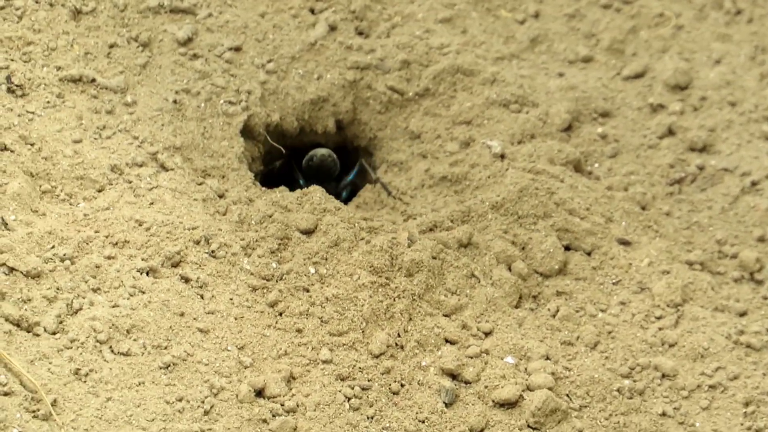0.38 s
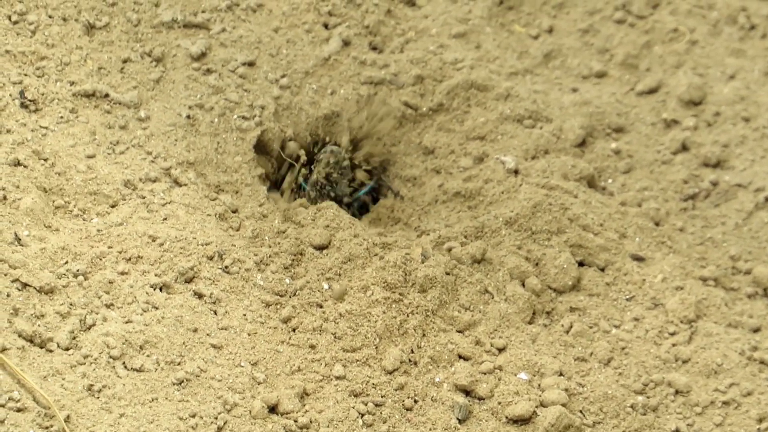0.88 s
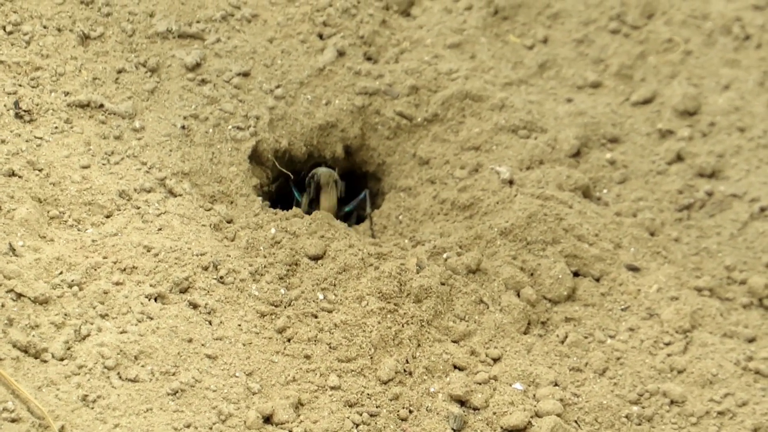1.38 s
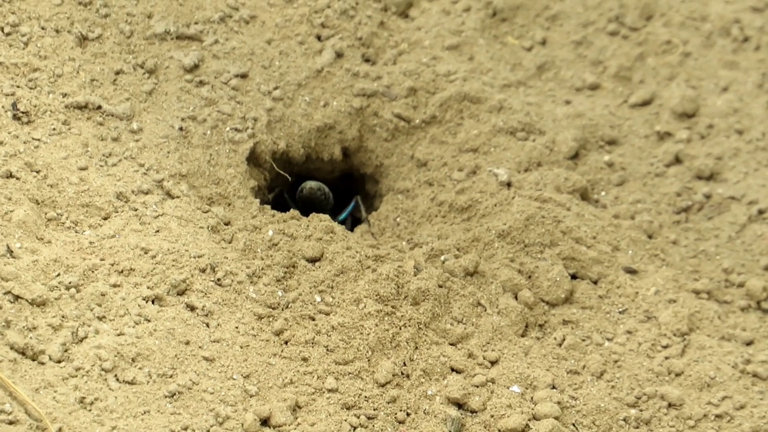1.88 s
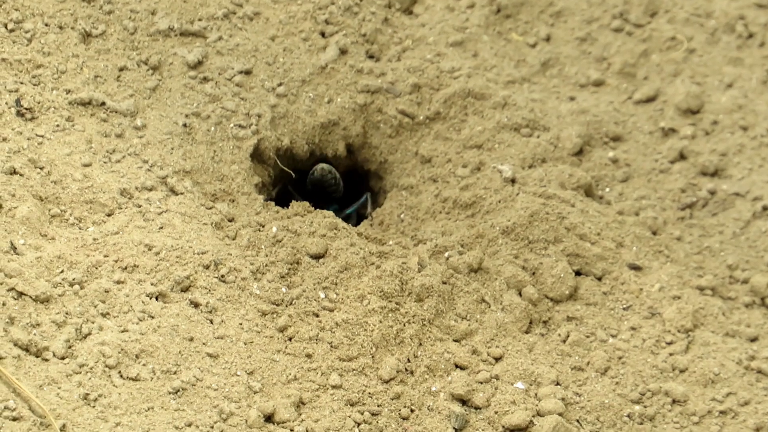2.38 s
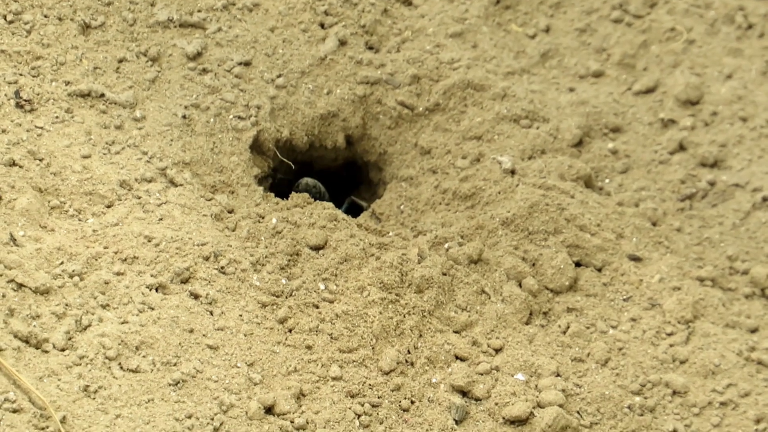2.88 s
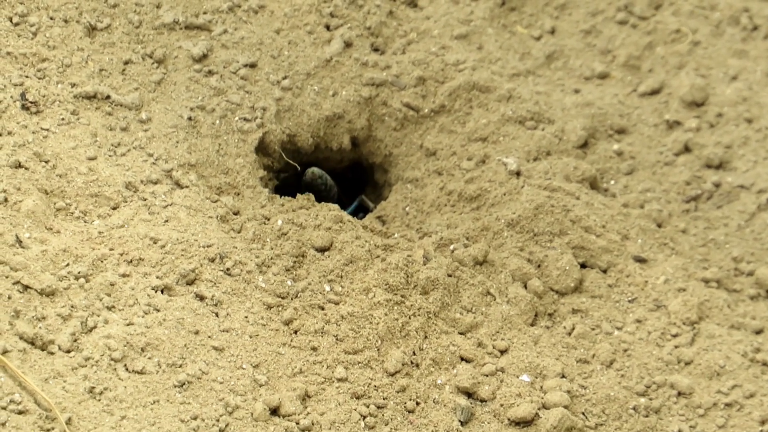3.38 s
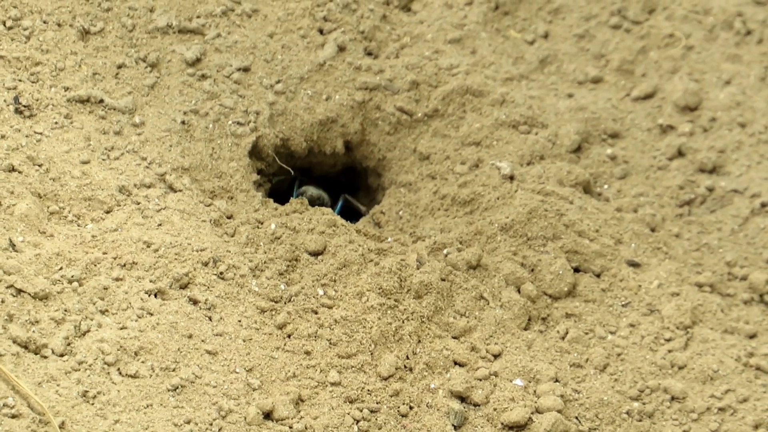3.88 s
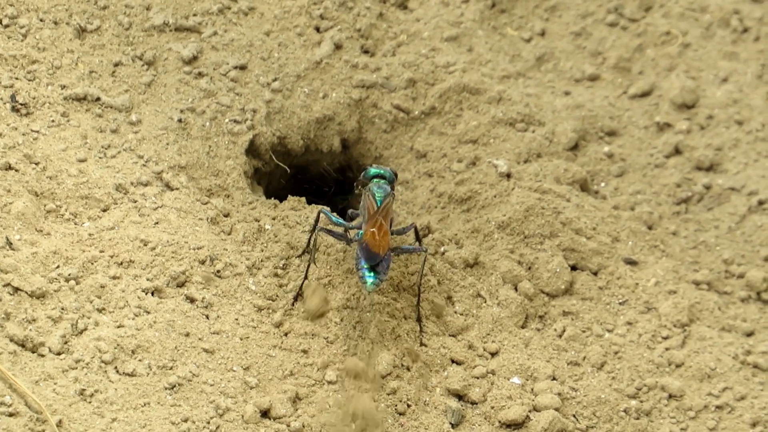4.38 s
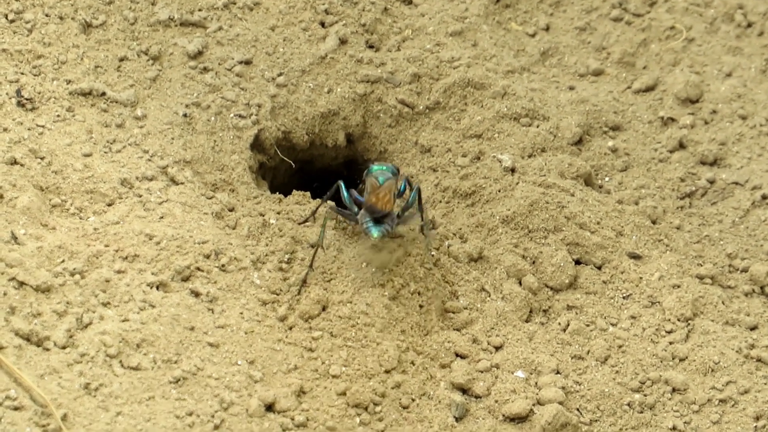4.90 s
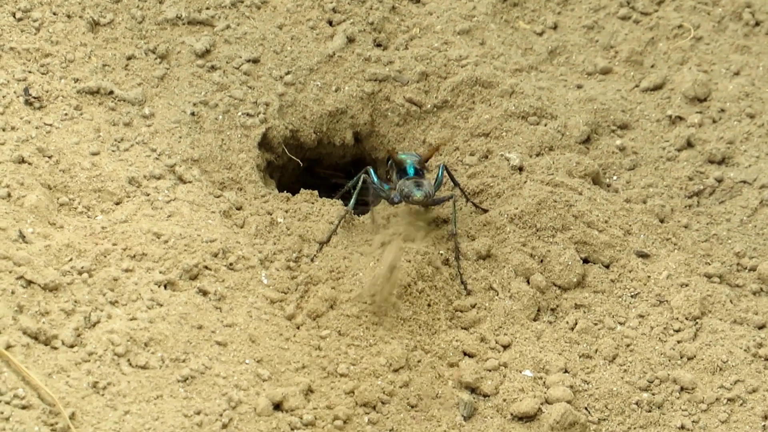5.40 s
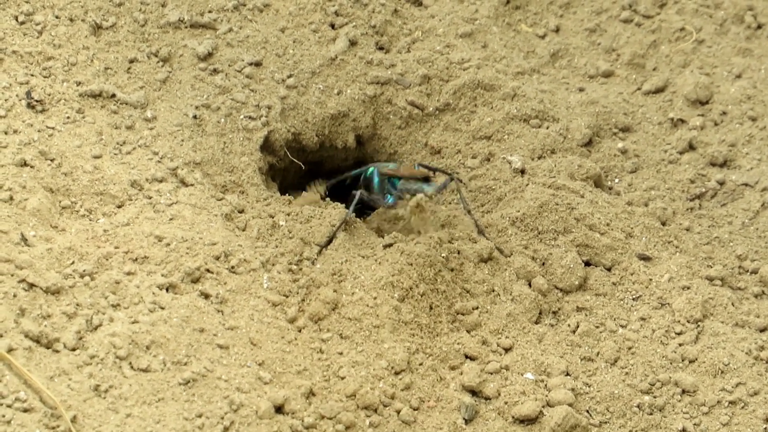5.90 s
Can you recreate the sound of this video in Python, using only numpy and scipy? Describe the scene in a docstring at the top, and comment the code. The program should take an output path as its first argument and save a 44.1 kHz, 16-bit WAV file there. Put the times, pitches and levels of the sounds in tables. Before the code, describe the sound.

Open-air birdsong in stereo. A clear, almost pure whistle dips, rises and drops away four times, growing fainter. Between whistles a nearby small bird spits rapid falling chatter, and a crow gives two long, grating caws, around two and three and a half seconds. Far squawks, high trills and tiny dry rustles fill the gaps, while wind bumps each of two spaced microphones separately.

```python
"""Birds in the open, two spaced microphones

Gusts thump each microphone on its own as shaped noise, over still air and a diffuse wash of noise.
Far birds squawk (resonant noise) and trill (5 kHz pips), dry rustles hiss, something croaks low.
A chattering bird near by throws quick glides; a crow caws twice, throat pulses through resonances.
The main voice repeats a clear rising-and-falling whistle, an almost pure tone with pitch-bent partials."""
import sys
import numpy as np
from scipy import signal
from scipy.fft import rfft, irfft, next_fast_len
from scipy.io import wavfile
from scipy.ndimage import uniform_filter1d, map_coordinates

SR = 44100
rng = np.random.default_rng(int(sys.argv[2]) if len(sys.argv) > 2 else 0)


def convert_level_to_amplitude(level_db):
    """Map a level in decibels to its linear amplitude factor."""
    exponent = np.asarray(level_db, float) / 20
    return 10 ** exponent


def store_wav(level_fs):
    """Save 16-bit WAV to argv[1]."""
    pcm = np.round(np.clip(np.atleast_2d(level_fs), -1, 1) * 32767)
    wavfile.write(sys.argv[1], SR, pcm.T.astype(np.int16))


N = 265570  # samples

# Still air, spectrum: (frequency [Hz], relative level [dB])
AIR_SPECTRUM = [(24, -23), (40, -4.5), (473, 0), (905, -4.5), (1960, 4.5), (3940, -13.5), (6830, -13),
                (8340, -42), (9690, -18.5), (13100, -15), (15600, -59)]
AIR_DB = -59
# Diffuse wash of mid and high noise, swelling around the loud calls: (time [s], level [dB])
WASH = [(0.0, -58.5), (0.45, -71), (1.25, -52), (1.5, -66), (1.7, -52), (2.15, -47), (2.9, -54),
        (3.25, -61), (3.8, -39), (4.2, -50), (4.66, -68.5), (5.6, -55), (5.75, -47.5), (6.02, -51)]
# Gusts: (time [s], half width [s], relative peak level [dB], left-right [dB])
GUSTS = [(.13, .05, -49.5, -35), (.55, 0.073, -51, 33), (.77, 0.07, -50, 44), (.89, 0.031, -46, 42),
         (0.969, 0.036, -38, 33), (1.088, 0.05, -40, 34), (1.34, 0.19, -57.5, -6), (1.612, 0.1, -33.5, 45),
         (1.712, 0.032, -32, 45), (1.859, .15, -43, -1), (2.042, 0.11, -40.5, 38), (2.199, 0.08, -38, 21),
         (2.46, 0.054, -48.5, -30), (2.6, 0.12, -40.5, -19), (2.97, 0.059, -48, 40), (3.14, .06, -52, 28),
         (3.36, 0.18, -57.5, 27), (4.19, 0.088, -65, -10), (4.7, 0.13, -55.5, -40), (5.068, 0.06, -34, -40),
         (5.2, 0.13, -43.5, -45), (5.44, 0.27, -44, -35), (5.769, 0.081, -28.5, -47),
         (5.971, 0.075, -43, -47)]
# Low buffeting at the capsules, spectrum: (frequency [Hz], relative level [dB])
BUFFET_SPECTRUM = [(15, -75), (25, -2), (75, 4.5), (160, 1), (221, -10.5), (414, -83), (500, -27),
                   (650, -82), (1100, -120)]
# Drop at one half width from a gust's peak; floor between gusts, on the scale of the gust levels
GUST_EDGE_DB, LULL_DB = 16.5, -83.5
# Brief dry rustles: (time [s], relative peak level [dB])
RUSTLES = [(0.4975, -48), (0.6434, -57), (0.8265, -46.5), (1.028, -42.5), (4.621, -42), (4.8294, -47.5)]
# Hoarse far calls: (time [s], length [s], resonance [Hz], width [Hz], level [dB])
SQUAWKS = [(0, 0.08, 1060, 504, -52.5), (0.195, 0.065, 3000, 1670, -48.5), (0.461, 0.11, 4760, 1400, -56),
           (0.534, .11, 2640, 1280, -49.5), (0.665, 0.071, 3000, 500, -49), (1.065, 0.051, 2270, 900, -57),
           (1.242, 0.09, 2250, 1554, -55.5), (1.7, 0.048, 3200, 2460, -39), (2.583, .17, 3080, 980, -44),
           (3.698, 0.24, 3394, 1610, -40), (4.415, 0.1, 3530, 1500, -55.5), (4.563, 0.15, 4800, 3040, -59),
           (4.642, 0.065, 2930, 2100, -52), (5.273, 0.12, 5570, 1090, -54.5),
           (5.297, 0.16, 3450, 1470, -57), (5.536, .14, 2770, 1375, -46.5),
           (5.539, 0.086, 5900, 900, -55.5), (5.688, 0.24, 6440, 1000, -63),
           (5.749, 0.15, 2900, 500, -51.5), (5.855, .15, 2630, 1800, -49.5)]
# High far trills: (time [s], length [s], pulse rate at start [1/s], at end [1/s], peak level [dB])
TRILLS = [(0.248, 0.21, 68, 26, -46.5), (0.813, 0.22, 51, 40.8, -44), (2.783, 0.03, 33, 44, -33),
          (3.128, 0.26, 55, 56, -52), (4.308, 0.183, 66, 34.4, -46), (4.933, 0.26, 70, 45, -47.5),
          (5.482, 0.2, 74, 39, -43.5)]
# Low throbbing croak: (time [s], length [s], from [Hz], to [Hz], relative level [dB])
CROAKS = [(3.374, 0.067, 347, 387, -45), (3.444, 0.0376, 417, 508, -45.5)]
# The near bird's falling phrase:
# (time after phrase start [s], length [s], from [Hz], to [Hz], relative level [dB])
PHRASE_GLIDES = [(-.012, 0.0093, 3283, 4550, -35.5), (0, 0.0118, 5690, 3470, -33),
                 (.009, 0.0215, 4074, 2943, -36), (0.028, 0.0267, 2870, 2734, -39),
                 (0.06, .018, 2433, 1480, -35.5), (0.081, 0.024, 1618, 1523, -42.5),
                 (0.174, 0.025, 1894, 1674, -47.5), (.162, 0.0144, 4210, 3500, -45.5),
                 (.176, .016, 3750, 3650, -35), (.178, 0.0443, 5500, 5355, -50),
                 (.203, 0.0079, 4840, 3590, -32), (0.21, .014, 3500, 2006, -42)]
# Where the phrase is sung: (time [s], level offset [dB])
PHRASE_STARTS = [(1.55, 1.5), (3.299, 0.5)]
# Other glides of the chattering birds: (time [s], length [s], from [Hz], to [Hz], relative level [dB])
LOOSE_GLIDES = [(0.185, 0.0134, 2670, 5060, -52), (0.197, 0.0215, 3960, 4060, -49),
                (0.315, .008, 2300, 1600, -57), (0.49, 0.067, 5670, 5670, -62),
                (0.187, 0.05, 2200, 2066, -56), (0.413, .057, 3880, 4850, -59),
                (0.643, 0.0246, 2066, 2430, -48.5), (0.676, 0.027, 3142, 3050, -53.5),
                (1.015, 0.017, 2110, 2350, -50), (1.065, 0.013, 2620, 2810, -42.5),
                (1.082, 0.0129, 2350, 1820, -41), (1.299, 0.033, 2730, 2770, -51.5),
                (1.409, 0.0195, 1170, 1720, -55), (1.422, 0.035, 1820, 2080, -56.5),
                (1.486, 0.026, 1733, 2430, -49), (1.499, 0.036, 4290, 5080, -44.5),
                (1.521, 0.03, 5110, 5210, -41.5), (1.7, 0.018, 1920, 1355, -51),
                (1.712, .012, 3160, 2940, -45), (3.511, 0.0091, 4500, 4260, -43),
                (1.57, 0.011, 4080, 3800, -41), (1.736, 0.012, 3750, 3350, -32),
                (1.65, .014, 1490, 1390, -44), (1.904, 0.0374, 1740, 1510, -50),
                (1.938, .029, 2065, 1248, -51), (1.936, 0.027, 3935, 3250, -35.5),
                (1.961, 0.0176, 3936, 2296, -38.5), (1.973, 0.033, 3420, 3330, -32.5),
                (1.984, 0.0112, 3320, 2100, -49), (1.987, 0.018, 4680, 3950, -42),
                (2.004, 0.0092, 3360, 4760, -26.5), (2.008, .016, 4690, 1397, -34),
                (2.034, .012, 2950, 2690, -27), (2.041, 0.02, 2760, 1700, -40),
                (2.072, 0.062, 3510, 3590, -38), (2.079, 0.009, 5160, 4930, -39),
                (2.846, 0.017, 3600, 3610, -42.5), (2.867, 0.0088, 3680, 3200, -36),
                (2.872, 0.031, 2155, 1414, -48), (2.883, 0.013, 4100, 3630, -46),
                (2.907, 0.0192, 1924, 1280, -51), (2.92, 0.0196, 3430, 4480, -44),
                (2.924, 0.0148, 1500, 2330, -41.5), (2.939, 0.033, 2960, 3176, -35.5),
                (2.943, .033, 6100, 6060, -51.5), (2.963, 0.0079, 5270, 3580, -42.5),
                (2.971, 0.0195, 3200, 2440, -37), (2.983, 0.0536, 2478, 2484, -34),
                (3.216, 0.087, 3250, 3170, -58.5), (3.222, 0.053, 3640, 4320, -52),
                (3.226, 0.0585, 1803, 2356, -53.5), (3.23, 0.05, 1526, 1610, -61),
                (3.453, 0.026, 1608, 1227, -54), (4.434, 0.017, 2730, 3000, -54),
                (4.44, 0.0416, 2072, 1773, -57), (4.46, .008, 3650, 2400, -60),
                (4.474, .008, 4000, 2500, -60), (4.68, .02, 2290, 2250, -63),
                (0.542, 0.029, 3310, 2890, -57), (0.579, 0.029, 2760, 2670, -55),
                (4.492, 0.0098, 4110, 2700, -55), (4.615, 0.0263, 2780, 3100, -50.5),
                (4.648, 0.0084, 2260, 4000, -58), (4.673, 0.01, 4180, 2300, -48),
                (4.814, 0.0467, 3710, 3856, -51.5), (4.87, 0.0124, 3700, 3030, -48.5),
                (4.886, 0.063, 2528, 2454, -59), (5.022, 0.057, 3820, 3955, -55.5),
                (5.083, 0.011, 3700, 3270, -50), (5.103, 0.037, 2640, 2430, -58),
                (5.188, 0.0106, 3610, 2920, -51.5), (5.236, .07, 4730, 5270, -62),
                (5.249, 0.029, 3610, 3910, -55.5)]
# Left-right: treble favours the left microphone, lower notes the right
SIDE_AT_3K_DB, SIDE_DB_PER_OCTAVE = 1.5, 6
# Caws: (time [s], length [s], level [dB], full effort until [s], fading after that [dB/s])
CAWS = [(2.058, .77, -28.5, 0.24, 12.5), (3.583, .745, -29.5, .21, 17)]
# Fixed resonances of the crow's body: (centre [Hz], width [Hz], relative level [dB])
BODY_RESONANCES = [(1150, 500, -32), (1680, 200, -7), (3300, 900, -24)]
# Treble resonances of the crow, set together by CROW_TREBLE_DB:
# (centre [Hz], width [Hz], relative level [dB])
TREBLE_RESONANCES = [(4320, 400, -39.5), (5900, 1660, 4), (9200, 1900, -8), (11260, 700, -6),
                     (13700, 1800, -20)]
CROW_TREBLE_DB = -30.5
BEAK_PER_PULSE = 24.78  # the beak resonance moves with effort: Hz per pulse per s
# Throat pulses per s at the opening and in full voice; s to get there
OPENING_RATE, FULL_RATE, RATE_RISE_S = 73, 82.4, .13
# From this age [s] the rate sags, in pulses per s each second
SAG_FROM_S, RATE_SAG = .2, 28
# Whistles: (time [s], crest time [s], crest pitch [Hz], crest level [dB], opening re crest [dB])
WHISTLES = [(0.795, 1.172, 1394, -28, -10), (2.161, 2.494, 1356, -29.5, -11),
            (3.65, 4.026, 1401, -33, -11.5), (5.42, 5.782, 1416, -36.5, -17)]
# Rise to the crest: (share of the way in time [0-1], height from dip to crest [share])
WHISTLE_RISE = [(0, -.4), (.06, .38), (.12, .3), (.25, .05), (.42, 0), (.58, .11), (0.749, .42),
                (0.901, .85), (0.999, 0.99)]
# Fall after the crest: (time after crest [s], pitch re crest [Hz], level re crest [dB])
WHISTLE_FALL = [(.03, -36.5, -5), (.085, -240, -8.5), (.13, -360, -8.5), (0.239, -610, -28.5)]
# Upper partials: (multiple of the pitch, relative level [dB], strongest at [Hz])
WHISTLE_PARTIALS = [(2, -38, 2700), (4, -23, 5600), (5, -26, 6300), (7, -33, 9700), (8, -25, 11000),
                    (10, -37, 13700)]
# Reflections shift the whistle's balance with pitch: (pitch [Hz], left-right [dB])
WHISTLE_BALANCE = [(850, 2), (1000, -3.5), (1130, -7.5), (1200, -7), (1290, -2), (1400, 1)]
# Dip pitch before a crest of 1390 Hz; Hz lower for each Hz of a higher crest
DIP_HZ, DIP_DEEPENS = 1144.5, .6
# Echoes from the trees: (frequency [Hz], decay time to -60 dB [s])
TREE_DECAY = [(800, 0.29), (3000, 0.34), (8000, 0.095)]


def unit(x):
    """Scaled to rms 1."""
    return x / np.sqrt(np.mean(x ** 2) + 1e-20)


def along(points, hz):
    """Reads (Hz, value) points on a log frequency axis."""
    f, v = np.transpose(points)
    return np.interp(np.log(hz + 1), np.log(f + 1), v)


def curves(rows):
    """First sample, and one value per sample for each column after the time."""
    s, *cols = np.transpose(rows)
    at = np.arange(round(s[0] * SR), min(round(s[-1] * SR), N))
    return at[0], [np.interp(at / SR, s, c) for c in cols]


def wobble(n, rate):
    """A smooth random curve of n samples, rate knots a second."""
    knots = rng.standard_normal(int(n * rate / SR) + 4)
    return map_coordinates(knots, [np.arange(n) * rate / SR])


def filtered(x, response):
    """x times a response of frequency."""
    m = next_fast_len(x.shape[-1] + 8192)
    spectrum = rfft(x, m) * response(np.fft.rfftfreq(m, 1 / SR))
    return irfft(spectrum, m)[..., :x.shape[-1]]


def peak(hz, centre_hz, width_hz):
    """Gain of a resonance, steep on both flanks."""
    return 1 / (1 + ((hz * hz - centre_hz ** 2) / (hz * width_hz + 1)) ** 2)


def resonances(hz, table):
    """Summed gain of (Hz, width Hz, dB) resonances."""
    return sum(convert_level_to_amplitude(db) * peak(hz, centre_hz, width_hz) for centre_hz, width_hz, db in table)


def swell(n, rise, fall):
    """Envelope of n samples with straight ramps at both ends, in s."""
    t = np.arange(n) / SR
    return np.clip(np.minimum(t / rise, t[::-1] / fall), 0, 1)


def add(bus, at, x, pan_db, right_lag):
    """Mixes x into both channels, the right one right_lag seconds late."""
    for side, sign in enumerate((1, -1)):
        start = max(at - round(sign * right_lag * SR / 2), 0)
        room = bus[side, start:start + len(x)]
        room += (x * convert_level_to_amplitude(sign * pan_db / 2))[:len(room)]


def side_db(hz):
    """Left-right balance of a small bird's note, tilting with pitch."""
    return np.clip(SIDE_AT_3K_DB + SIDE_DB_PER_OCTAVE * np.log2(hz / 3000), -10, 10)


def patchy(depth_db):
    """Two noises whose level drifts in shared patches of time and pitch."""
    z = signal.stft(rng.standard_normal((2, N)), nperseg=512)[2]
    field = rng.standard_normal(z.shape[1:])
    field = uniform_filter1d(uniform_filter1d(field, 6, 0), 10, 1)
    return signal.istft(z * convert_level_to_amplitude(depth_db * unit(field)), nperseg=512)[1][:, :N]


def background():
    """Still air and a diffuse wash that swells around the loud calls, both patchy shaped noise."""
    air = unit(filtered(patchy(depth_db=6.5), lambda f: convert_level_to_amplitude(along(AIR_SPECTRUM, f))))
    wash = unit(filtered(patchy(depth_db=5), lambda f: peak(f, 2200, 5040) * peak(f, 4890, 4700)))
    db = curves(WASH)[1][0]
    db = np.pad(db, (0, N - len(db)), "edge")
    return convert_level_to_amplitude(AIR_DB) * air + convert_level_to_amplitude(db) * wash


def wind():
    """Lumpy low buffeting, unrelated between the microphones; a harder gust reaches higher."""
    s, half, gust_db, pan_db = np.transpose(GUSTS)[:, :, None]
    ticks = np.arange(0, N + 64, 64)
    left_share = 1 / (1 + convert_level_to_amplitude(-2 * pan_db))
    power = convert_level_to_amplitude(2 * (gust_db - GUST_EDGE_DB * np.abs(ticks / SR - s) / half))
    power_by_side = [np.interp(np.arange(N), ticks, (power * share).sum(0))
                     for share in (left_share, 1 - left_share)]
    level = 2 * np.sqrt(np.array(power_by_side) + convert_level_to_amplitude(2 * LULL_DB))
    lumps = convert_level_to_amplitude(3.6 * np.array([wobble(N, 35), wobble(N, 35)]))
    low = filtered(rng.standard_normal((2, N)), lambda f: convert_level_to_amplitude(along(BUFFET_SPECTRUM, f)))
    high = filtered(rng.standard_normal((2, N)), lambda f: peak(f, 172.4, 192) ** 2)
    # the higher band grows with the square of the level
    gusts = level * (unit(lumps * low) + 25 * level * unit(lumps * high))
    return filtered(gusts, lambda f: 1 / (1 + (55 / (f + 1)) ** 3))  # the capsules cut the deepest bass


def rustles():
    """Fast-fading bursts of bright hiss, a few hundredths of a second long."""
    bus, t = np.zeros((2, N)), np.arange(round(.06 * SR)) / SR
    for s, db in RUSTLES:
        hiss = unit(filtered(rng.standard_normal((2, len(t))), lambda f: peak(f, 9000, 13000)))
        fading = convert_level_to_amplitude(db - 7.5 - 60 * t / 0.11) * swell(len(t), 0.0037, 0.0055)
        bus[:, round(s * SR):][:, :len(t)] += fading * hiss
    return bus


def squawks():
    """Rasping noise in one resonance, blurred by distance so that the microphones hear it differently."""
    bus = np.zeros((2, N))
    for s, length, hz, width_hz, db in SQUAWKS:
        n, pan_db = round(length * SR), side_db(hz) / 2
        common, own = rng.standard_normal(n), rng.standard_normal((2, n))
        rasp = unit(filtered(common + 3.1 * own, lambda f: peak(f, hz, width_hz)))
        gain = convert_level_to_amplitude(db + 2.4 * wobble(n, 83.5)) * swell(n, 0.0085, 0.05)
        call = gain * convert_level_to_amplitude([[pan_db / 2], [-pan_db / 2]]) * rasp
        room = bus[:, round(s * SR):][:, :n]
        room += call[:, :room.shape[1]]
    return bus


def triller():
    """Short 5 kHz pips in a row whose rate glides, mostly slowing down."""
    bus = np.zeros((2, N))
    for s, length, start_rate, end_rate, db in TRILLS:
        n = round(length * SR)
        turns = np.cumsum(np.linspace(start_rate, end_rate, n)) / SR
        pips = np.exp(-((turns % 1 - .5) / .12) ** 2) * convert_level_to_amplitude(2.5 * wobble(n, 40))
        phase = 2 * np.pi * np.cumsum(5000 + 25 * wobble(n, 30)) / SR + 0.72 * wobble(n, 206.5)
        trill = convert_level_to_amplitude(db) * pips * swell(n, 0.023, 0.058) * np.sin(phase)
        add(bus, round(s * SR), trill, 6, -.0007)
    return bus


def croak():
    """A soft low glide that throbs unevenly."""
    bus = np.zeros((2, N))
    for s, length, from_hz, to_hz, db in CROAKS:
        n = round(length * SR)
        throb = .6 + 0.45 * np.cos(2 * np.pi * np.cumsum(85 + 18 * wobble(n, 56)) / SR)
        phase = 2 * np.pi * np.cumsum(np.geomspace(from_hz, to_hz, n)) / SR
        tone = np.sin(phase + 0.48 * wobble(n, 88))
        add(bus, round(s * SR), convert_level_to_amplitude(db + 4) * swell(n, 0.0065, 0.01) * throb * tone, -3, 0)
    return bus


def syllable_noise_gain(f):
    """Broad bands of the noise round the syllables."""
    bright = peak(f, 10100, 1000) + convert_level_to_amplitude(-25) * peak(f, 15700, 1500)
    return bright + convert_level_to_amplitude(6.0) * peak(f, 5900, 1960) + convert_level_to_amplitude(14.5) * peak(f, 2760, 4100) ** 2


def chatter():
    """Each syllable is an unsteady glide with a weak overtone and a burst of broad noise round it."""
    bus = np.zeros((2, N))
    noise = unit(filtered(rng.standard_normal(N), syllable_noise_gain))
    sung = [(s + after, length, from_hz, to_hz, level + db) for s, level in PHRASE_STARTS
            for after, length, from_hz, to_hz, db in PHRASE_GLIDES]
    for s, length, from_hz, to_hz, db in sung + LOOSE_GLIDES:
        at, n = round(s * SR), round(length * SR)
        glide_hz = np.geomspace(from_hz, to_hz, n)
        unsteady_hz = glide_hz * (1 + .015 * wobble(n, 70))
        phase = 2 * np.pi * np.cumsum(unsteady_hz) / SR + .3 * wobble(n, 400)
        rasp = 1 + 0.095 * wobble(n, 2477)  # the voice grates, spreading noise round its pitch
        tone = rasp * np.sin(phase) + convert_level_to_amplitude(-40) * np.sin(2 * phase)
        syllable = tone + convert_level_to_amplitude(-14) * np.resize(noise[at:], n)
        gain = convert_level_to_amplitude(db + 3 + 3 * wobble(n, 250)) * swell(n, .0035, .004)
        add(bus, at, gain * syllable, side_db(glide_hz), 0)
    return bus


def crow():
    """Throat pulses and breath noise gated by them, through a beak resonance that sinks as the call tires."""
    bus = np.zeros((2, N))
    for s, length, full_db, hold, fade in CAWS:
        at, n = round(s * SR), round(length * SR)
        age = np.arange(n) / SR
        db = full_db - fade * np.maximum(age - hold, 0)
        rate = np.interp(age, [0, RATE_RISE_S], [OPENING_RATE, FULL_RATE])
        rate = rate - RATE_SAG * np.maximum(age - SAG_FROM_S, 0)
        beak_hz = BEAK_PER_PULSE * (rate + 0.39 * (FULL_RATE - rate))  # moves less than the rate
        turns = np.cumsum(rate * (1 + .004 * wobble(n, 30))) / SR
        pulses = np.diff(np.floor(turns), prepend=0) * convert_level_to_amplitude(1.5 * rng.standard_normal(n))
        breath = np.exp(-.8 * (turns % 1)) * rng.standard_normal(n)
        hz, t, z = signal.stft([unit(pulses), unit(breath)], SR, nperseg=1024)
        hz, frame = hz[:, None], np.minimum(t * SR, n - 1).astype(int)
        noisy = np.clip((hz - 1700) / 2000, .3, .97)  # the treble is mostly breath
        shape = peak(hz, beak_hz[frame], 796) ** 2 + convert_level_to_amplitude(-19.5) * peak(hz, 9.8 * rate[frame], 220)
        shape += resonances(hz, BODY_RESONANCES)
        treble_gain = convert_level_to_amplitude(CROW_TREBLE_DB + 6.5 * wobble(n, 9.8)[frame])
        shape += treble_gain * resonances(hz, TREBLE_RESONANCES)
        # single partials wax and wane
        flicker = uniform_filter1d(uniform_filter1d(rng.standard_normal(shape.shape), 2, 0), 8, 1)
        shape *= convert_level_to_amplitude(2.5 * unit(flicker))
        # each pulse is smeared over most of a cycle, each frequency arriving at its own moment
        smear = np.exp(1j * 2.8 * wobble(len(hz), SR / 2))[:, None]
        mixed = z[0] * smear * np.sqrt(1 - noisy ** 2) + z[1] * noisy
        voice = signal.istft(mixed * shape, SR, nperseg=1024)[1][:n]
        add(bus, at, convert_level_to_amplitude(db) * swell(n, 0.029, 0.06) * unit(voice), -4.5, .0009)
    return bus


def whistler():
    """An almost pure tone; faint, blurred upper partials show when they cross a resonance."""
    bus = np.zeros((2, N))
    for s, crest_s, crest_hz, crest_db, opening_db in WHISTLES:
        dip_hz = DIP_HZ - DIP_DEEPENS * (crest_hz - 1390)
        rise = [(s + way * (crest_s - s), dip_hz + height * (crest_hz - dip_hz),
                 opening_db * (1 - way ** 2.5)) for way, height in WHISTLE_RISE]
        fall = [(crest_s + after, crest_hz + drop_hz, db) for after, drop_hz, db in WHISTLE_FALL]
        at, (hz, db) = curves(rise + fall)
        hz = uniform_filter1d(hz, size=1100, mode="nearest")  # the pitch bends, it has no corners
        phase = 2 * np.pi * np.cumsum(hz) / SR
        blurred = phase + .2 * wobble(len(hz), 220)
        upper = sum(convert_level_to_amplitude(level) * peak(k * hz, best_hz, 1350) * np.sin(k * blurred)
                    for k, level, best_hz in WHISTLE_PARTIALS)
        waver_db = 1.5 * wobble(len(hz), 22)
        gain = convert_level_to_amplitude(crest_db + db + waver_db) * swell(len(hz), 0.029, 0.0078)
        tone = gain * (np.sin(phase) + upper)
        add(bus, at, np.sqrt(2) * tone, along(WHISTLE_BALANCE, hz), -.00015)
    return bus


def nearby(x):
    """Ground, trunks and walls return a few distinct copies within 40 ms, different at each microphone."""
    taps = np.zeros((2, round(.04 * SR)))
    for side in taps:
        delay = rng.uniform(0.0027, .04, size=9)
        side[(delay * SR).astype(int) - 1] = rng.choice([-1, 1], size=9) * convert_level_to_amplitude(-60 * delay / 0.072)
    taps = taps / np.linalg.norm(taps, axis=1, keepdims=True)
    return signal.fftconvolve(x, taps, axes=1)[:, :N]


def trees(x):
    """Scattered echoes as decaying noise, different at each microphone."""
    hz, t, z = signal.stft(rng.standard_normal((2, SR // 2)), SR, nperseg=256)
    decay = convert_level_to_amplitude(-60 * t / along(TREE_DECAY, hz)[:, None])
    tail = signal.istft(z * decay, SR, nperseg=256)[1]
    late = np.pad(x, [(0, 0), (300, 0)])  # the echoes start 300 samples late
    return signal.fftconvolve(late, tail / np.linalg.norm(tail[0]), axes=1)[:, :N]


def scene():
    """Birds with their echoes, over rustles, wind and background."""
    bed = background() + wind() + rustles()
    far = squawks() + triller()
    far = far + convert_level_to_amplitude(-3.5) * trees(far)
    glides = chatter()
    glides += convert_level_to_amplitude(-6) * nearby(glides) + convert_level_to_amplitude(-5) * trees(glides)
    calls = croak() + crow() + whistler()
    calls += convert_level_to_amplitude(-10) * trees(calls)
    return bed + far + glides + calls


def low_pass(x):
    """Removes everything above the highest recorded frequency."""
    return signal.sosfilt(signal.butter(12, 15710, fs=SR, output="sos"), x)


def record(dry):
    """The microphones lose up to 6 dB of treble above about 7 kHz."""
    dull = filtered(dry, lambda hz: convert_level_to_amplitude(-6 / (1 + (7200 / (hz + 1)) ** 16)))
    return low_pass(dull)


dry = scene()
out = record(dry)
store_wav(out)
```